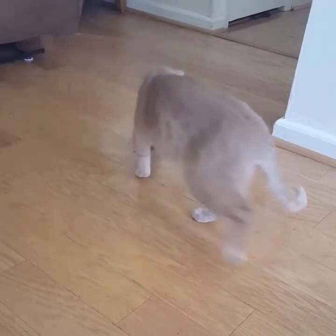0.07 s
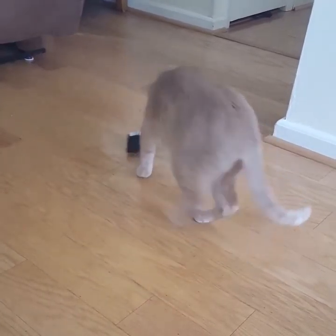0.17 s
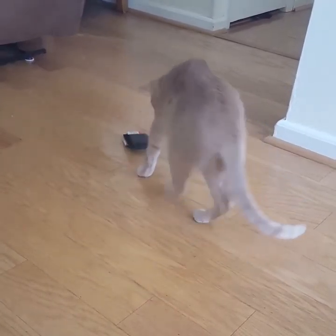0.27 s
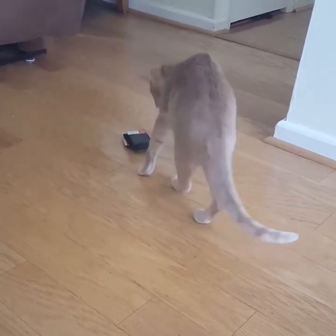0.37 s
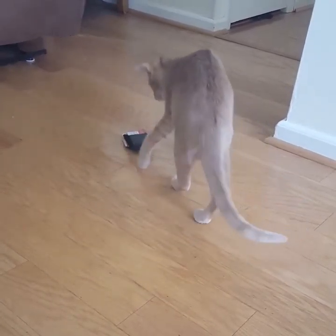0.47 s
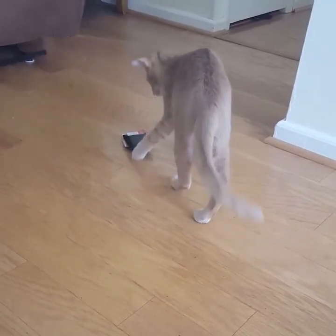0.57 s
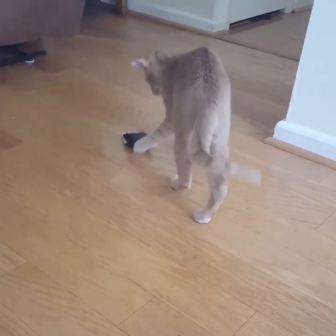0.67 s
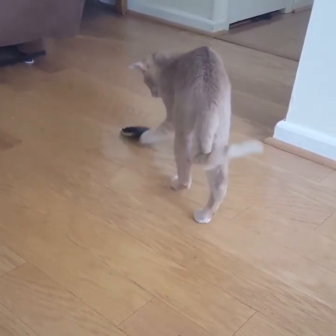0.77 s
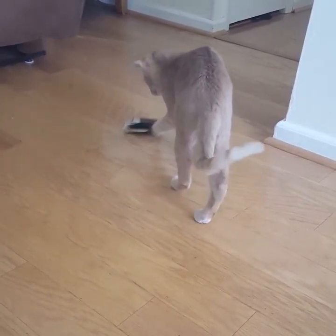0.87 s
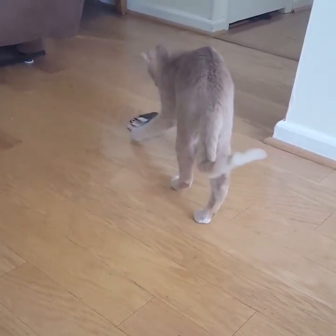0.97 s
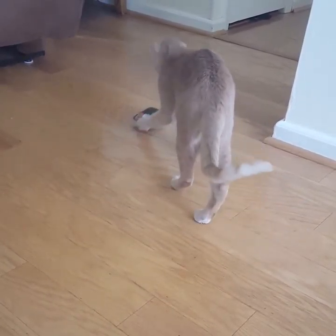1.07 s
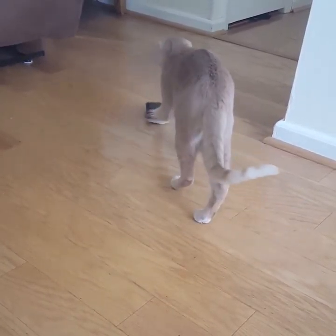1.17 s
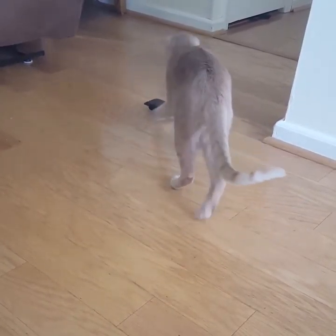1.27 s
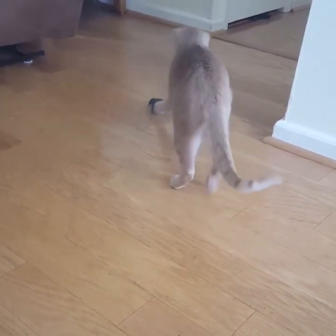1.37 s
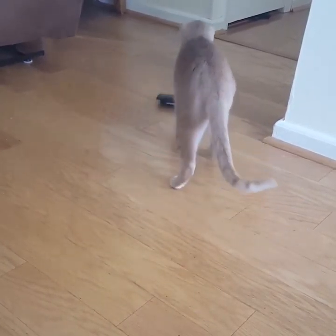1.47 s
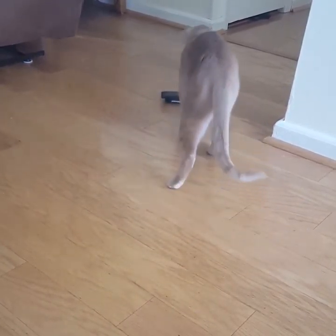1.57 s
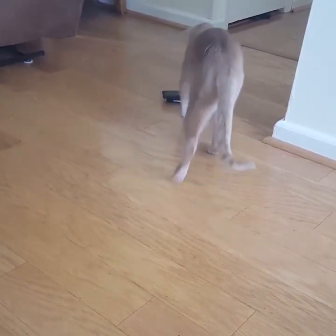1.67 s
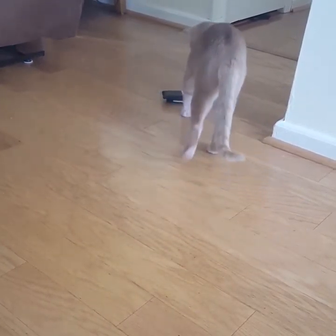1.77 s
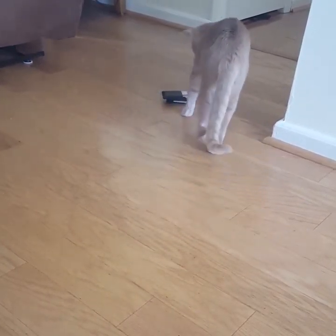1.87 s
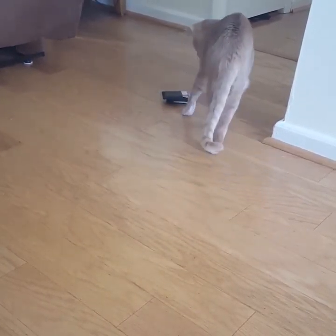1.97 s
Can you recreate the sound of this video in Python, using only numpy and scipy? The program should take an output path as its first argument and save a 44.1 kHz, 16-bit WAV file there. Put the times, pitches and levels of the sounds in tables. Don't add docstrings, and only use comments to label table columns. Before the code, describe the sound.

A leather wallet drops on a wooden floor with a tight burst of thuds and slaps, bounces twice, then after a lull knocks softly and scrapes along; bare reverberant room, faint motor hum, microphone a few steps away.

```python
import sys
import numpy as np
from scipy import signal
from scipy.io import wavfile
from scipy.ndimage import uniform_filter1d, minimum_filter1d

SR = 44100
rng = np.random.default_rng(int(sys.argv[2]) if len(sys.argv) > 2 else 0)


def transcribe(signal):
    frames = np.atleast_2d(signal).T
    limited = np.clip(frames, -1, 1)
    pcm = np.round(limited * 32767).astype(np.int16)
    wavfile.write(sys.argv[1], SR, pcm)


def volts(x):
    e = np.asarray(x, float) / 20
    return 10 ** e


N = 88200
TIME_S = np.arange(N) / SR


def evened(x):
    return x / np.sqrt(np.mean(x ** 2) + 1e-20)


def read(points, hz, axis=1):
    table = np.transpose(points)
    return np.interp(np.log(hz + 1), np.log(table[0] + 1), table[axis])


def level(points):
    s, db = np.transpose(points)[:2]
    return volts(np.interp(TIME_S, s, db, left=-120, right=-120))


def colour(x, points):
    log_gain = np.log(volts(read(points, np.fft.rfftfreq(4096, 1 / SR))))
    both_sides = np.concatenate([log_gain, log_gain[-2:0:-1]])
    spectrum = np.exp(np.conj(signal.hilbert(both_sides)))
    taps = np.fft.ifft(spectrum).real[:2048]
    return signal.oaconvolve(x, taps / np.linalg.norm(taps))[:len(x)]


def resonate(x, hz, width_hz):
    turn = np.exp(2j * np.pi * np.cumsum(hz * np.ones(len(x))) / SR)
    r = np.exp(-np.pi * width_hz / SR)
    return 2 * (turn * signal.lfilter([1 - r], [1, -r], x / turn)).real


def add(mix, s, sound):
    part = mix[round(s * SR):][:len(sound)]
    part += sound[:len(part)]


def background():
    # frequency in Hz, density in dB per Hz.
    air = [(20, -38), (60, -11), (150, -8.5), (240, -2), (500, -18.5), (1300, -25), (4000, -36.5),
           (15000, -42.5)]
    # multiple of the motor pitch, level in dB.
    orders = [(1, -69.5), (2, -66.5), (3, -60), (4, -57), (5, -65), (6, -78.5), (19, -67), (20, -84.5)]
    motor_hz, width_hz, air_db = 59.58, 9.3, -54
    hum = np.zeros(N)
    for multiple, db in orders:
        order = resonate(rng.standard_normal(N), multiple * motor_hz, width_hz)
        order = resonate(order, multiple * motor_hz, width_hz)
        hum += volts(db) * evened(order)
    return volts(air_db) * colour(rng.standard_normal(N), air) + hum


def knocks():
    # start in seconds, thud level in dB, thud pitch in Hz,
    # thud length in cycles, slap level in dB.
    landings = [(.2235, -22.5, 483, 1.7, -48), (0.2365, -15.5, 603, 1.73, -30.5),
                (.2412, -16, 516, 2.05, -31), (0.2566, -15, 860, 0.98, -22.5),
                (0.2589, -24.5, 420, 4.8, -16), (.2612, -15.5, 716, 1.08, -17),
                (0.2636, -14.5, 1500, 3.7, -23), (.4129, -16.5, 1400, 2.5, -23.5),
                (0.421, -23, 1746, 13.5, -27.5), (0.4387, -15, 1490, 1.8, -31),
                (.5048, -19.5, 1400, 1.3, -26), (0.5084, -27.5, 2450, 7.5, -34),
                (1.022, -48, 770, 3.3, -48.5), (1.0947, -24.5, 636, 1.7, -37),
                (1.183, -34.5, 550, 2.2, -51), (1.173, -25, 1780, 4, -37.5), (1.177, -26, 1110, 2.1, -34),
                (1.291, -32, 1400, 2.9, -37.5), (1.362, -34, 1150, 4.7, -40.5),
                (1.367, -33, 1540, 1.6, -38), (1.693, -24, 770, 2.66, -34.5), (1.700, -24, 957, 4.2, -48),
                (1.710, -25, 1020, 4.3, -37.5), (1.727, -27, 720, 3.24, -60)]
    # frequency in Hz, density in dB per Hz.
    slap_spectrum = [(150, -18.5), (400, -2.5), (1700, 2), (2400, -4), (3300, -1.5), (4300, -8.5),
                     (9500, -26), (14500, -33)]
    slap_s, thud_wet_db, click_wet_db = 0.0024, -1, 24
    direct, wet = np.zeros(N), np.zeros((5, N))
    t = np.arange(800) / SR
    click = colour(np.eye(1, 800)[0], slap_spectrum)
    for k, (s, thud_db, hz, cycles, slap_db) in enumerate(landings):
        u = t[t < cycles / hz] * hz / cycles
        swell = np.sin(np.pi * u ** 0.85) ** 2
        thud = -volts(thud_db) * swell * np.sin(2 * np.pi * cycles * u)
        rattle = rng.standard_normal(len(t)) * np.exp(-(t / slap_s) ** 2)
        add(direct, s, thud)
        add(direct, s, volts(slap_db) * colour(rattle, slap_spectrum))
        spot = wet[k % len(wet)]
        add(spot, s, volts(thud_wet_db) * thud)
        add(spot, s, volts(slap_db + click_wet_db) * click)
    return direct, wet


def room(x):
    # frequency in Hz, T60 in seconds, level in dB.
    decay = [(150, 0.49, -1), (600, 0.57, -2.5), (1400, 0.44, -2), (2440, 0.55, 0.5), (3500, 0.46, 0.5),
             (9400, 0.49, 0)]
    start_s, rise_s, early_db, early_s = 0.001, 0.004, 8.5, 0.0075
    hz, t, z = signal.stft(rng.standard_normal((len(x), SR)), SR, nperseg=256)
    t60_s, band_db = read(decay, hz)[:, None], read(decay, hz, axis=2)[:, None]
    tail = signal.istft(z * volts(-60 * t / t60_s + band_db), SR, nperseg=256)[1]
    t = np.arange(tail.shape[1]) / SR
    tail = tail * np.clip((t - start_s) / rise_s, 0, 1) * volts(early_db * np.exp(-t / early_s))
    return signal.fftconvolve(x, tail / np.linalg.norm(tail[0]), axes=1)[:, :N].sum(0)


def scrape():
    # time in seconds, pressure in dB, fold pitch in Hz.
    slide = [(.40, -62, 1500), (0.421, -31, 1540), (0.449, -35, 1590), (.49, -50.5, 1950),
             (0.529, -39.5, 2180), (.66, -58, 2360), (1.088, -78, 1730), (1.104, -38.5, 1800),
             (1.15, -41.5, 1220), (1.2, -45, 1400), (1.27, -53.5, 1480), (1.33, -44.5, 1350),
             (1.399, -40.5, 1870), (1.499, -51, 1870), (1.592, -53, 1600), (1.647, -39, 1560),
             (1.759, -43, 1670), (1.902, -55.5, 1880)]
    # frequency in Hz, density in dB per Hz.
    rub_spectrum = [(150, -37.5), (300, -13), (600, -6), (900, -0.5), (1600, 1.5), (3300, -12), (9000, -39),
                    (15000, -54.5)]
    # multiple of the fold pitch, width in Hz, level in dB.
    leather = [(.62, 300, 3), (1.01, 380, 9)]
    catches_per_s, spread_db, clump_db = 3000, 1.5, 1.4
    chance, side, size = rng.random((3, N))
    catches = (chance < catches_per_s / SR) * np.sign(side - 0.5)
    catches = catches * volts(-spread_db * np.log(size + 0.0043))
    clumps = volts(clump_db * evened(uniform_filter1d(rng.standard_normal(N), size=500)))
    drive = evened(catches) * level(slide) * clumps
    time_s, _, pitch_hz = np.transpose(slide)
    fold_hz = np.interp(TIME_S, time_s, pitch_hz)
    rub = colour(drive, rub_spectrum)
    for multiple, width_hz, db in leather:
        rub = rub + volts(db) * resonate(drive, multiple * fold_hz, width_hz)
    return rub


def swish():
    # time in seconds, level in dB.
    strokes = [
        (.82, -69),
        (.88, -64.5),
        (.925, -54),
        (.97, -56.5),
        (1.03, -52),
        (1.08, -55.5),
        (1.2, -63.5),
        (1.45, -54.5),
        (1.8, -64.5),
    ]
    # frequency in Hz, density in dB per Hz.
    fur = [(700, -17), (1500, -4.5), (3000, -8), (5500, -4.5), (9000, -9), (12000, -8), (14500, -11),
           (15500, -41)]
    flicker_db = 1.54 * evened(uniform_filter1d(rng.standard_normal(N), size=300))
    return colour(rng.standard_normal(N), fur) * volts(flicker_db) * level(strokes)


def thin_top(x, power_db):
    over_db, hold_s, step_s = -42, 0.27, 0.07
    dull_from_hz, dull_per_db = 6670, 0.5
    bands, from_hz, band_hz = 4, 10150, 750
    thin_db, thin_per_db, spread_db = -13, 0.3, 7
    hz, t, z = signal.stft(x, SR, nperseg=512)
    hold = round(hold_s * SR)
    peak_db = -minimum_filter1d(-power_db, size=hold, origin=hold // 2 - 1, mode="nearest")
    held_db = np.interp(t, TIME_S, peak_db)
    fall_db = np.minimum(held_db - np.interp(t, TIME_S, power_db), 14)
    busy = 1 / (1.5 + np.exp(over_db - held_db))
    steps = rng.standard_normal((40, bands))[(t / step_s).astype(int)]
    z[hz > dull_from_hz] *= volts(-dull_per_db * fall_db * busy)
    for k in range(bands):
        band = abs(hz - from_hz - (k + 0.5) * band_hz) <= band_hz / 2
        cut_db = np.minimum(thin_db - thin_per_db * fall_db + spread_db * steps[:, k], 0)
        z[band] *= volts(cut_db * busy)
    return signal.istft(z, SR, nperseg=512)[1][:N], np.interp(TIME_S, t, busy)


def whine(busy, power_db):
    # frequency in Hz, level in dB.
    tones = [(10686, -58), (11440, -58), (12188, -57), (12936, -55)]
    share = 0.51
    total = sum(volts(db) * np.sin(2 * np.pi * hz * TIME_S) for hz, db in tones)
    return busy * volts(share * power_db) * total


def scene():
    air_and_motor = background()
    direct, wet = knocks()
    rub = scrape()
    slide_wet_db = -3.5
    reflections = room(np.vstack([wet, volts(slide_wet_db) * rub]))
    return (air_and_motor + direct + rub + reflections + swish())[None]


def top_cut(x):
    return signal.sosfilt(signal.butter(12, 15710, fs=SR, output="sos"), x)


def record(dry):
    power_db = 10 * np.log10(abs(uniform_filter1d(dry[0] ** 2, size=2000)) + 1e-12)
    thin, busy = thin_top(dry[0], power_db)
    low_pass = signal.firwin(127, 14500, fs=SR)
    mix = signal.oaconvolve(thin + whine(busy, power_db), low_pass, "same")
    return top_cut(mix[None])


dry = scene()
out = record(dry)
transcribe(out)
```